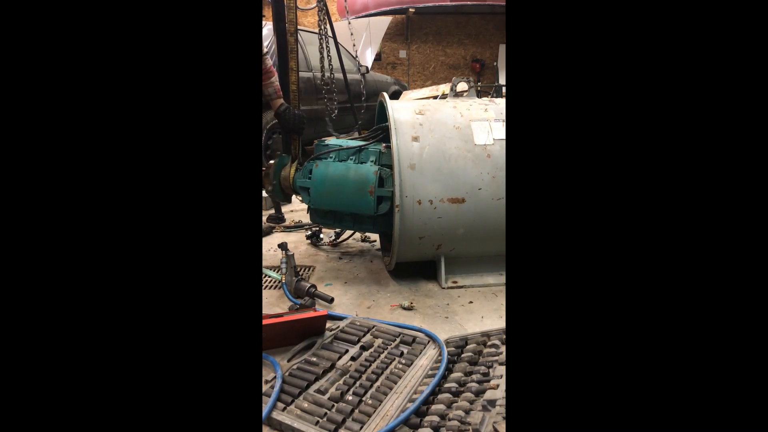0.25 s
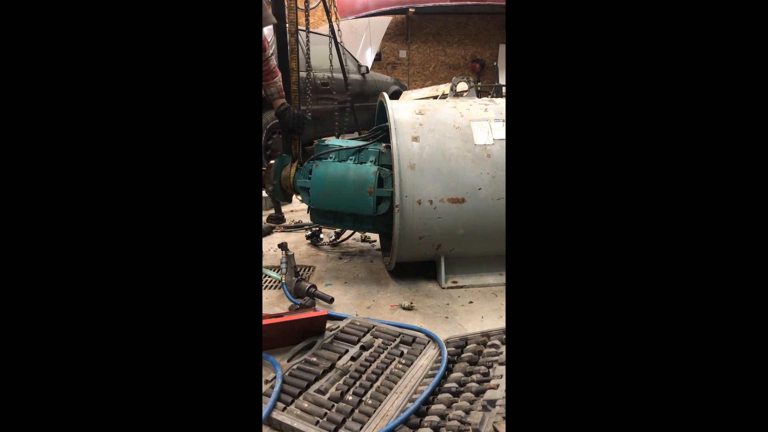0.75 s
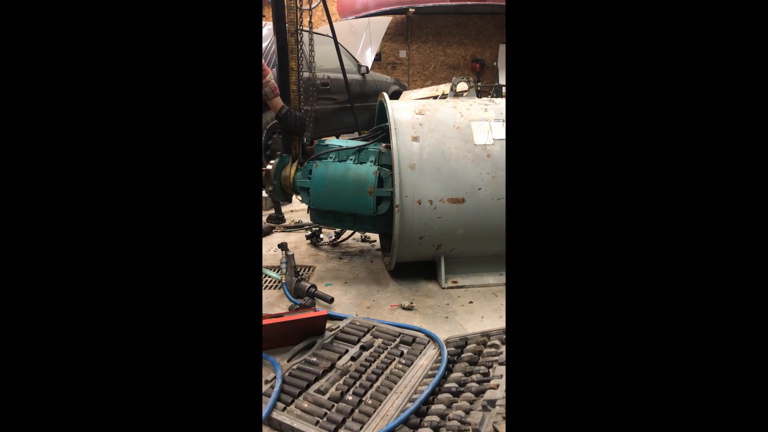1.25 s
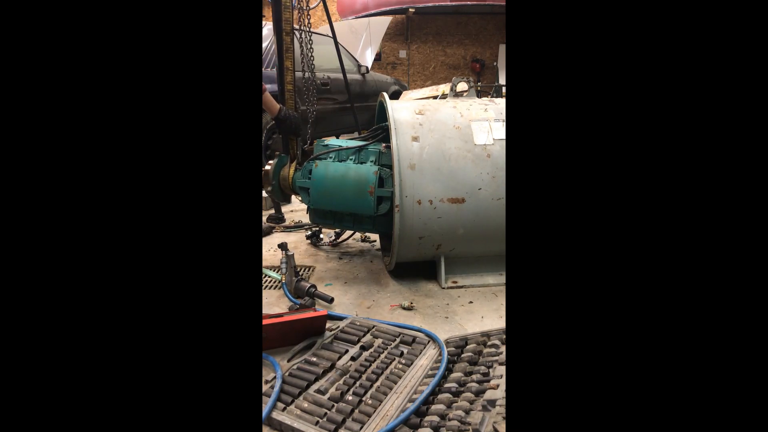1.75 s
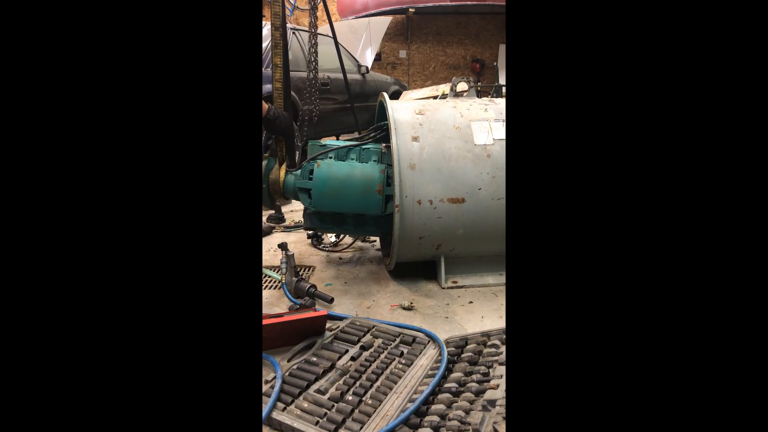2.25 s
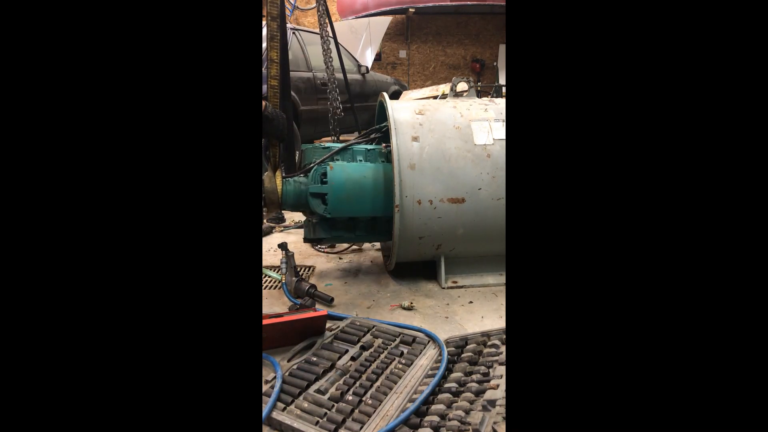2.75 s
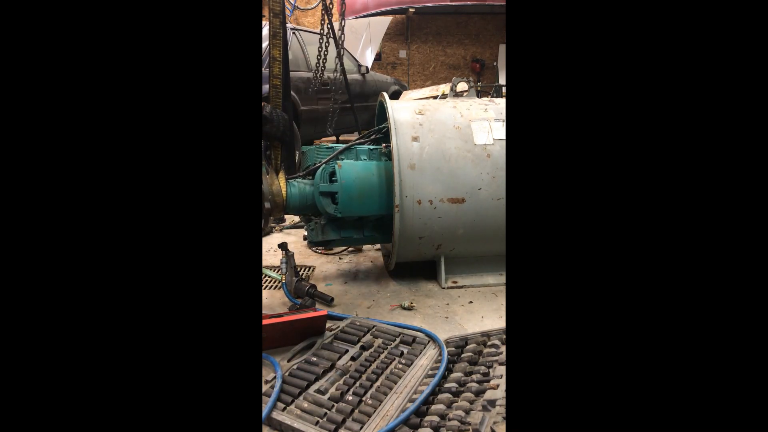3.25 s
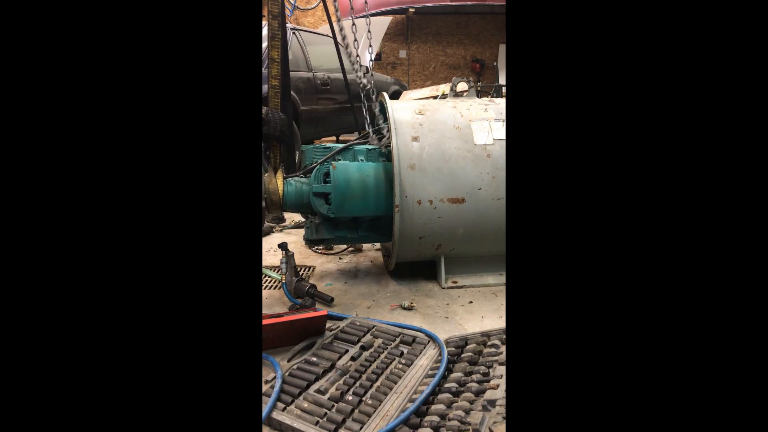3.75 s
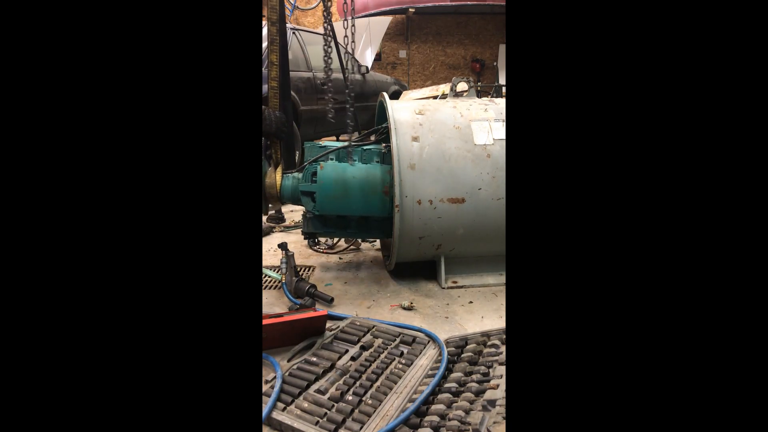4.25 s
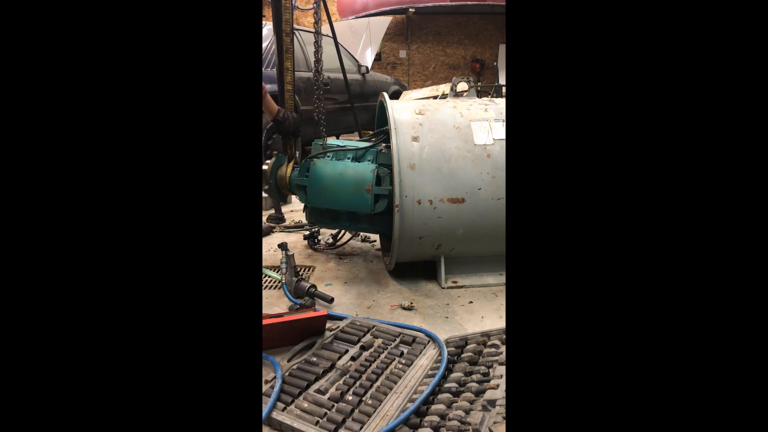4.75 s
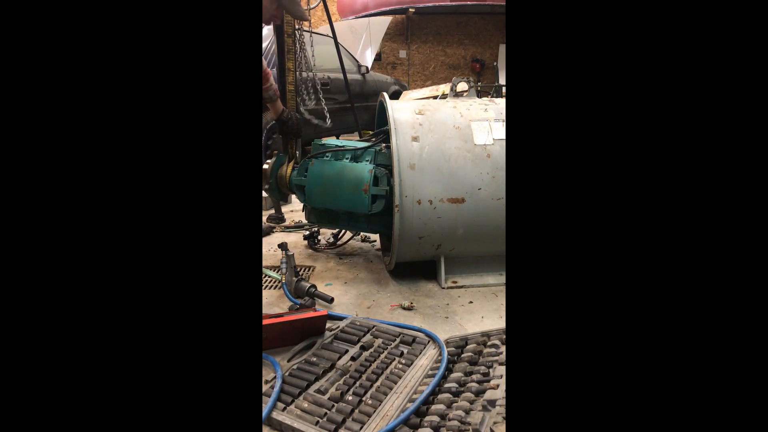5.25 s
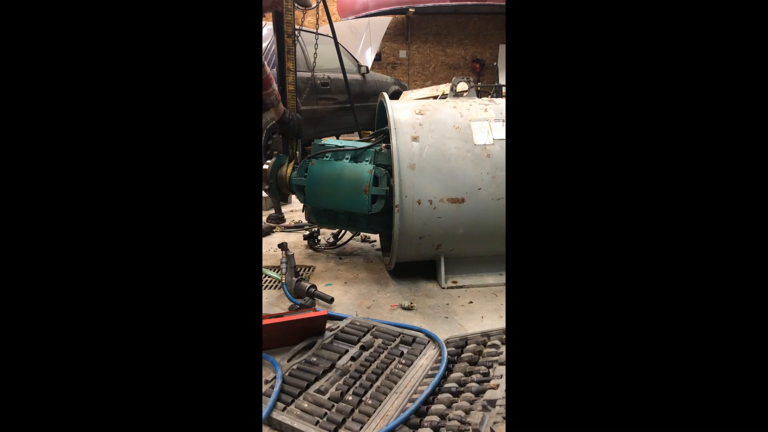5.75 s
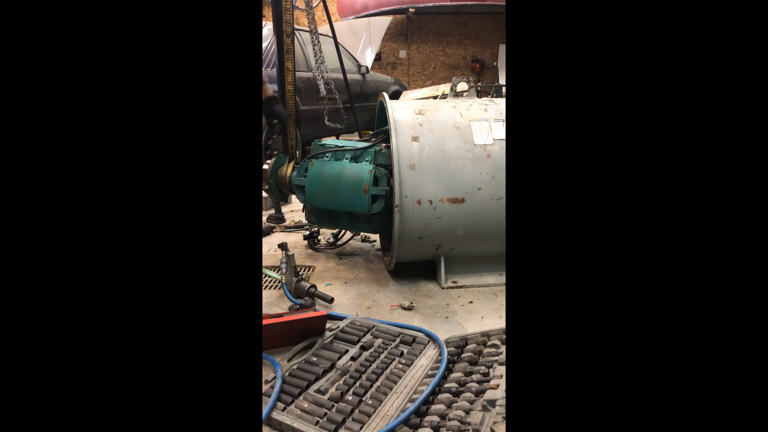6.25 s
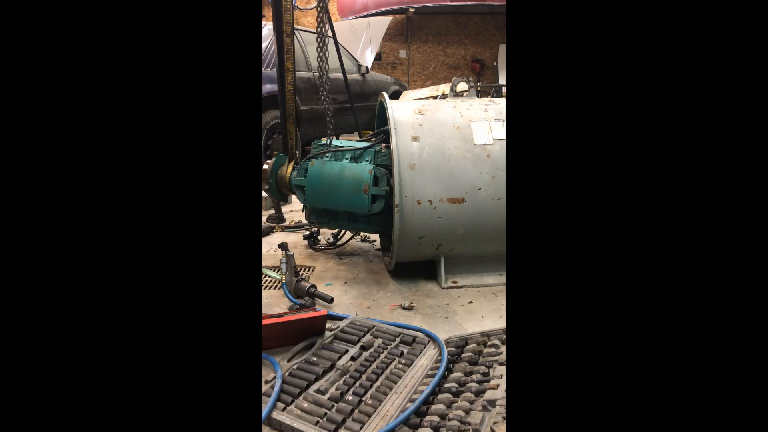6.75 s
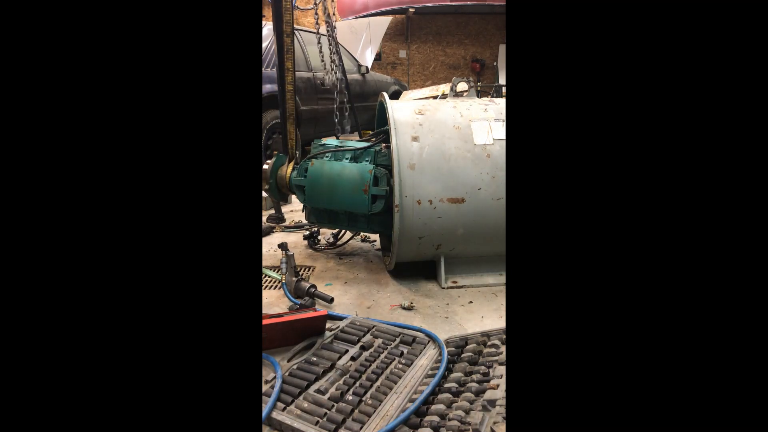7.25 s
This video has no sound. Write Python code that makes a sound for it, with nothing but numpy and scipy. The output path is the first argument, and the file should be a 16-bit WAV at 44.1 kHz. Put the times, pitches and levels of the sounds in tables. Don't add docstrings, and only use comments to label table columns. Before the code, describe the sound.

Chain links clink and snap as a heavy metal rotor rumbles and scrapes in its steel casing, then one loud ringing clang in a workshop.

```python
import sys
import numpy as np
from scipy import signal
from scipy.fft import rfft, irfft, dct
from scipy.io import wavfile

SR = 44100
rng = np.random.default_rng(int(sys.argv[2]) if len(sys.argv) > 2 else 0)


def natural_amplitude(level_db):
    exponent = np.asarray(level_db, float) / 20
    return 10 ** exponent


def inscribe(sig):
    pcm = np.round(np.clip(np.atleast_2d(sig).T, -1, 1) * 32767)
    wavfile.write(sys.argv[1], SR, pcm.astype(np.int16))


N = 330750

# (time [s], force [dB], rise [s per 20 dB], fall [s per 20 dB])
STROKES = [
    (5.55, -35, 0.0011, 0.2574),
    (5.62, -40, 0.043, 0.6155),
    (5.944, -34, 0.15, 0.0651),
    (5.957, -19.5, 0.014, 0.0154),
    (5.984, -12, 0.01, 0.0155),
    (6.0, -40, .011, 0.17),
]


def in_time(rows):
    s, *columns = np.transpose(rows)
    return [np.interp(np.arange(N) / SR, s, c) for c in columns]


def at_hz(points, hz):
    table_hz, values = np.transpose(points)
    return np.interp(np.log(hz + 1), np.log(table_hz), values)


def rms_one(x):
    return x / np.sqrt(np.mean(x ** 2) + 1e-20)


def band_pass(x, order, edges_hz):
    return signal.sosfilt(signal.butter(order, edges_hz, "band", fs=SR, output="sos"), x)


def band_noise(low_hz, high_hz):
    return rms_one(band_pass(rng.standard_normal(N), 2, [low_hz, high_hz]))


def colour(x, spectrum):
    hz = np.fft.rfftfreq(len(x), 1 / SR)
    low, high = spectrum[0][0], spectrum[-1][0]
    skirts = 1 / (1 + (low / (hz + 1)) ** 8 + (hz / high) ** 8)
    return rms_one(irfft(rfft(x) * natural_amplitude(at_hz(spectrum, hz)) * skirts, len(x)))


def grains(per_s, spread_db):
    sizes = natural_amplitude(spread_db * np.minimum(rng.exponential(1, N), 5)) * rng.choice([-1, 1], N)
    return rms_one(sizes * (rng.random(N) < per_s / SR))


def ring(drive, hz, t60):
    r, w = natural_amplitude(-60 / (max(t60, .003) * SR)), 2 * np.pi * hz / SR
    return signal.lfilter([0, np.sin(w)], [1, -2 * r * np.cos(w), r * r], drive + 1e-18)


def workshop_walls():
    # (frequency [Hz], t60 [s])
    walls_t60 = [(200, 0.61), (2000, 0.55), (6000, 0.55), (16000, 0.34)]
    t, out = np.arange(SR) / SR, 0
    for low in 125 * 2. ** np.arange(7):
        band = band_pass(rng.standard_normal(SR), 2, [low, 2 * low])
        out = out + band * natural_amplitude(-60 * t / at_hz(walls_t60, 1.2 * low))
    return out / np.sqrt(np.sum(out ** 2))


def chain_rustle():
    # (time [s], level [dB])
    haul = [(0.0, -47), (0.2, -62.5), (0.56, -59), (0.978, -74), (1.38, -56.5), (1.64, -68), (1.92, -74),
            (2.14, -59), (2.6, -55.5), (3.016, -40), (3.43, -68), (4.054, -59), (4.48, -62), (4.93, -46),
            (5.2, -68.5), (6.55, -60), (7.338, -71.5), (7.5, -48.5)]
    # (frequency [Hz], level [dB per Hz])
    chain_colour = [(1470, -40), (2500, -3.5), (4080, -1.5), (4970, -7), (6350, -4.5), (7670, -13),
                    (8570, -5.5), (10400, -15.5), (15100, -8.5), (16100, 7.5), (16500, -48)]
    chain_db, = in_time(haul)
    tick = np.exp(-np.arange(400) / 60.) * rng.standard_normal(400)
    rattle = signal.fftconvolve(grains(per_s=70, spread_db=2.0), tick)[:N + 2]
    fine_ticks = rms_one(np.diff(rattle, 2))
    return natural_amplitude(chain_db + 4.0) * colour(0.35 * fine_ticks + rng.standard_normal(N), chain_colour)


def bursts():
    # (time [s], length [s], level [dB], lower edge [Hz])
    jingle_runs = [(0.084, .04, -51, 6500), (0.558, 0.008, -49, 12000), (0.777, 0.018, -58, 10500),
                   (1.006, 0.06, -52, 5750), (1.07, 0.038, -49, 5100), (1.572, 0.011, -50, 9100),
                   (3.561, 0.043, -44, 5300), (4.5, .3, -53, 6500), (6.611, 0.15, -48.5, 6500),
                   (6.218, 0.036, -38.5, 7400), (6.322, 0.0096, -43, 8400)]
    # (time [s], level [dB])
    brush_runs = [(2.736, -54), (2.772, -50), (2.827, -45), (2.843, -46), (2.951, -47), (3.105, -44),
                  (3.126, -45), (3.218, -53), (4.078, -50), (4.586, -48), (4.628, -46), (4.663, -43),
                  (4.884, -42), (5.172, -55)]
    # (time [s], length [s], level [dB], centre [Hz])
    scuff_runs = [(0.71, 0.019, -55.5, 2000), (1.272, 0.058, -39, 2900), (1.75, 0.017, -55, 1300),
                  (2.332, 0.0093, -36.5, 300), (3.792, 0.072, -53.5, 3100), (4.36, .13, -54, 6000),
                  (4.833, 0.09, -33, 1210), (5.967, 0.055, -18, 11500), (6.493, 0.003, -31, 11300),
                  (6.605, 0.084, -40.5, 3900), (7.039, 0.031, -55, 1170)]
    # (time [s], length [s], level [dB], centre [Hz])
    squeal_runs = [(0.369, 0.25, -59, 5400), (.37, 0.32, -66, 4060), (1.925, 0.13, -56, 4340),
                   (2.109, 0.27, -52.5, 1080), (2.11, 0.26, -52, 4220), (2.72, 0.085, -46, 271),
                   (3.065, 0.055, -43, 1350), (3.201, 0.074, -47, 2800), (4.351, 0.3, -48, 1017),
                   (4.972, 0.13, -45, 1740), (0.0, 0.065, -52, 1085), (0.0, 0.14, -52, 1630),
                   (0.0, .08, -54, 3500), (0.022, 0.089, -58, 2920), (1.931, 0.091, -55.5, 1016),
                   (2.124, .2, -52, 3550), (2.55, 0.42, -50.5, 187), (2.6, 0.36, -52, 582),
                   (2.62, 0.4, -50.5, 980), (3.167, .04, -48, 6900), (4.419, 0.094, -46.5, 325),
                   (4.58, 0.049, -45, 165.5), (4.898, .07, -43, 270), (5.56, .2, -57, 720),
                   (6.606, .12, -49.5, 2600), (6.608, 0.087, -47, 3250), (6.601, 0.15, -53.5, 5400),
                   (6.85, 0.11, -59.5, 960), (7.033, 0.1, -61, 1017), (5.337, .2, -60, 4100),
                   (0.429, 0.094, -60, 1050), (0.472, 0.11, -61, 3100), (1.938, 0.13, -56.5, 4020),
                   (1.94, 0.13, -58, 4500), (2.109, 0.11, -52, 4520), (2.229, 0.096, -52.5, 1300),
                   (3.202, 0.13, -49.5, 329), (3.219, 0.092, -51, 3750), (3.655, .05, -63, 4600),
                   (4.51, 0.098, -51, 3750), (6.648, .2, -60, 300), (6.62, 0.17, -57.5, 803)]
    top_hz, brush_s, brush_above_hz = 15700, .009, 9500
    jingles_per_s, scuffs_per_s, squeals_per_s = 610, 3300, 1500
    scuff_width, squeal_width = 0.71, 0.055

    bright_runs = list(jingle_runs) + [(s, brush_s, db, brush_above_hz) for s, db in brush_runs]
    runs = [(s, length, db, (hz + top_hz) / 2, top_hz - hz, jingles_per_s)
            for s, length, db, hz in bright_runs]
    runs += [(*row, scuff_width * row[3], scuffs_per_s) for row in scuff_runs]
    runs += [(*row, squeal_width * row[3], squeals_per_s) for row in squeal_runs]

    out, size = np.zeros(N), SR // 2
    for s, length, level_db, hz, width_hz, per_s in runs:
        stroke = np.sin(np.pi * np.minimum(np.arange(size) / SR / length, 1) ** 0.6) ** .5
        hits = natural_amplitude(2.1 * rng.standard_normal(size)) * (rng.random(size) < per_s / SR)
        contacts = rng.standard_normal(size) * (0.27 + hits * np.sqrt(SR / per_s))
        edges = np.clip([hz - width_hz / 2, hz + width_hz / 2], 50, .45 * SR)
        heard = band_pass(contacts * stroke, 1, edges)
        i = round(s * SR)
        out[i:i + size] += (natural_amplitude(level_db) * np.sqrt(SR / 4 / width_hz) * heard)[:N - i]
    return out


def snaps():
    # (time [s], peak [dB], centre [Hz])
    snap_rows = [(0.091, -32, 10500), (0.1207, -27.5, 12400), (0.2318, -27, 9300), (0.278, -27.5, 9700),
                 (0.3688, -27, 6070), (0.631, -27.5, 10400), (0.722, -31, 8800), (0.9847, -45, 12100),
                 (1.0065, -41, 9900), (1.0188, -32, 11400), (1.024, -27, 12100), (1.03, -23.5, 11500),
                 (1.037, -25.5, 11800), (1.0888, -34, 10000), (1.407, -35, 7100), (1.8324, -43, 6100),
                 (1.925, -23, 10700), (1.9294, -25, 12300), (1.9666, -21, 10200), (2.1073, -26, 8300),
                 (2.1126, -17, 11700), (2.2235, -23, 7600), (2.2285, -26, 7500), (2.2697, -22, 11900),
                 (2.3432, -20, 7100), (2.469, -31, 9400), (2.5306, -29, 9900), (2.5449, -31, 11300),
                 (2.608, -26, 9800), (2.8713, -21, 8900), (2.876, -21, 7600), (2.9997, -18, 7860),
                 (3.0799, -20, 6800), (3.562, -20.5, 9800), (3.5703, -17, 10900), (3.5746, -25, 9600),
                 (3.597, -22, 13300), (3.5993, -29, 11800), (3.7267, -31.5, 8100), (3.929, -40, 11300),
                 (3.969, -31, 12700), (4.499, -17, 7200), (4.5027, -13.5, 9800), (4.722, -24, 9100),
                 (4.8168, -23, 10100), (5.5527, -26, 7400), (6.2267, -18, 7000), (6.245, -20, 7800),
                 (6.3247, -27, 6220), (6.4434, -36, 7800), (6.451, -31, 9300), (6.4964, -24, 11600),
                 (6.503, -29, 7900), (6.552, -33, 11500), (6.6044, -21, 5120), (7.302, -35, 11100),
                 (7.308, -28, 12300), (7.335, -27.5, 11600), (7.4214, -16, 5740), (7.433, -21, 9000)]
    echo_ms, echo_db, tail_db, tail_t60_s = .8, -8, -15, 0.0059
    out, size = np.zeros(N), 1024
    t = np.arange(size) / SR
    for s, peak_db, hz in snap_rows:
        click = natural_amplitude(tail_db - 60 * t / tail_t60_s) * rng.standard_normal(size)
        click[0] += 1
        click[round(echo_ms * SR / 1000)] -= natural_amplitude(echo_db)
        heard = band_pass(click, 2, [.58 * hz, min(1.7 * hz, .45 * SR)])
        i = round(s * SR) - 2
        out[i:i + size] += (natural_amplitude(peak_db + 1.0) * heard / np.abs(heard).max())[:N - i]
    return out


def knocks():
    # (time [s], peak [dB], frequency [Hz], t60 [s])
    knock_rows = [(0.373, -52, 6000, 0.1), (0.674, -43, 4310, 0.05), (1.32, -34.5, 300, 0.029),
                  (1.406, -44, 6280, 0.15), (1.831, -45, 6150, 0.087), (1.957, -29.5, 203, 0.049),
                  (2.344, -32, 6960, 0.066), (3.172, -30, 208, 0.098), (3.33, -39.5, 472, 0.24),
                  (4.027, -41, 300, 0.085), (4.049, -37, 3200, 0.076), (4.05, -37, 2860, 0.068),
                  (5.56, -47.5, 963, 2.3), (5.873, -31.5, 196, 0.038), (6.606, -51, 5254, 0.44),
                  (6.855, -41.5, 200, 0.051), (7.333, -42, 148.7, 0.053), (.466, -45, 3940, .1),
                  (1.215, -49, 5340, .1), (1.941, -34, 4220, 0.047), (2.008, -42, 7000, .03),
                  (2.248, -41, 6200, .04), (3.231, -34, 2740, .06), (4.05, -42, 2240, 0.1),
                  (4.052, -47, 1518, 0.21), (7.38, -38, 1860, 0.12)]
    out, size = np.zeros(N), SR // 2
    for s, peak_db, hz, t60 in knock_rows:
        contact = 0.044 * rng.standard_normal(size) * natural_amplitude(-60 * np.arange(size) / SR / t60)
        contact[0] += 1
        i = round(s * SR)
        out[i:i + size] += (natural_amplitude(peak_db) * ring(contact, hz, 0.48 * t60))[:N - i]
    return out


def clinks():
    # (time [s], peak [dB], ring [Hz], sparkle [dB re peak])
    slack_links = [(0.229, -40, 9200, -2), (0.2743, -47, 5600, -9), (0.3681, -33, 6120, -13),
                   (1.0244, -37.5, 9050, -4), (1.405, -37, 5930, -12), (1.9026, -42, 6300, -15),
                   (1.9251, -27, 8740, -8), (2.3155, -31.5, 8800, -8), (2.3426, -28, 6800, -9.5),
                   (2.9986, -23, 3590, -16), (3.562, -42, 7400, 3), (3.5952, -45, 9400, 1),
                   (3.7254, -48, 7100, -9), (3.7499, -47.5, 8700, 3), (3.9669, -48, 4260, 0),
                   (4.217, -37.5, 5500, -1), (4.241, -33.5, 6350, -6), (4.4997, -20, 6700, -15),
                   (4.563, -31, 8170, -2), (4.815, -38, 3240, 3), (6.497, -45, 3040, -6),
                   (7.151, -51, 5000, -12), (7.3018, -46.5, 9360, -0.5), (7.3363, -44.5, 9150, -8.5),
                   (7.4191, -25.5, 3910, -12)]
    taut_links = [(0.4212, -36.5, 6640, -10), (0.4648, -32, 6140, -27), (0.628, -44.5, 8870, -1),
                  (1.2684, -32.5, 3240, -25), (1.512, -38, 2900, -23), (1.83, -42, 6250, -26),
                  (1.964, -35.5, 8900, -4), (2.1075, -23.5, 4200, -5.5), (2.2205, -21, 5710, -8),
                  (2.265, -34, 9250, 3.5), (2.7876, -28, 3610, -2), (2.828, -31, 2560, -13),
                  (3.1926, -32, 2840, -11), (3.3787, -36.5, 3760, -7.5), (4.0292, -35, 4350, -13),
                  (4.05, -31, 3270, -17), (4.152, -27, 5480, -12), (6.441, -40, 3130, -18),
                  (6.6027, -23, 6060, -19)]
    loaded_links = [(0.0144, -27, 3500, -7.5), (0.12, -38, 3570, -19), (2.1395, -30, 4440, -34.5),
                    (2.292, -29.5, 4070, -18), (2.6064, -37, 9380, 2), (2.862, -25.5, 3310, -6),
                    (3.078, -22, 7070, -5.5), (3.229, -32.5, 2560, -17), (3.3003, -33.5, 3790, -28),
                    (4.7195, -29, 3510, -4), (4.8273, -30, 3530, -1.5), (5.3373, -41.5, 3830, -28),
                    (6.818, -40, 5230, -9.5), (7.3796, -32, 6660, -16)]
    # (frequency [Hz], level [dB per Hz])
    crack_colour = [(880, -6), (1500, -15), (2320, -5), (4280, 4.5), (4930, -0.5), (6460, 2.5), (10000, -5),
                    (13000, -81), (22000, -120)]
    kinds = [(slack_links, -25.5), (taut_links, -16.5), (loaded_links, -11.5)]
    contacts = [(*row, thud_db) for rows, thud_db in kinds for row in rows]

    out, size = np.zeros(N), SR // 4
    t = np.arange(size) / SR
    rise = np.minimum(t / 0.00263, 1)
    snap = rise * (natural_amplitude(-60 * t / 0.037) + 0.13 * natural_amplitude(-60 * t / 0.2))
    thud_fall = rise * natural_amplitude(-60 * t / 0.108)
    mode_fall = rise * natural_amplitude(-9.5 - 60 * t / 0.041)
    bright = colour(rng.standard_normal(N), crack_colour)
    sparkle, dull = band_noise(8300, 15700), band_noise(680, 3800)
    for s, peak_db, hz, sparkle_db, thud_db in contacts:
        i = round(s * SR)
        n = min(size, N - i)
        crack = (0.39 * bright[i:i + n] + natural_amplitude(sparkle_db - 1.0) * sparkle[i:i + n]) * snap[:n]
        thud = natural_amplitude(thud_db) * dull[i:i + n] * thud_fall[:n]
        modes = mode_fall * sum(np.sin(2 * np.pi * ratio * hz * t) for ratio in (.97, 1, 1.035))
        out[i:i + n] += natural_amplitude(peak_db + 1.5) * (crack + thud + modes[:n])
    return out


def shell(drive):
    # (frequency [Hz], level [dB per Hz])
    shell_colour = [(180, -50), (300, -38.5), (978, -12.5), (1390, -10), (1460, -2), (2100, -8),
                    (3190, 0.5), (4370, -6), (8220, -10), (13800, -26.5), (16000, -25.5)]
    # (frequency [Hz], t60 [s])
    shell_decay = [(300, 0.39), (1500, 0.72), (4000, 0.66), (9000, 0.4), (16000, 0.3)]
    spacing_hz, blur = 45.4, 1.0
    out, start = np.zeros(N), round((STROKES[0][0] - .1) * SR)
    size = N - start
    lines = rng.standard_normal(size) * (rng.random(size) < 1 / (spacing_hz * size / SR * 2))
    steady = rms_one(dct(lines)) + blur * rng.standard_normal(size)
    modes = colour(steady, shell_colour)
    edges = 250 * 2 ** np.arange(0, 6.2, .5)
    for k, (low, high) in enumerate(zip(edges, edges[1:])):
        r = natural_amplitude(-120 / (at_hz(shell_decay, np.sqrt(low * high)) * SR))
        put_in = band_pass(drive[start:] + 1e-18, 2, [low, high]) ** 2 * SR / 2 / (high - low)
        height = np.sqrt(signal.lfilter([1 - r], [1, -r], put_in))
        out[start:] += (-1) ** k * height * band_pass(modes, 2, [low, high])
    return out


def casing():
    # (time [s], force [dB])
    link_taps = [
        (5.6157, -32.5),
        (5.6611, -31),
        (5.7394, -33.5),
        (5.8771, -34.5),
        (5.916, -30.5),
    ]
    rim_hz = [963, 1497, 1836, 3133, 3230, 5443, 7973, 11280, 13370]
    # (level [dB], t60 [s])
    rim_modes = [(-17.5, .45), (-20, .7), (-23.5, 0.41), (-2, 0.66), (-10, 0.33), (-26, .3), (-19, 0.3),
                 (-17, 0.25), (-22, .25)]
    clear_hz = [963, 1497, 1630, 2212, 2612, 2981, 3116, 3244, 4047, 4607, 6155, 6445, 6568, 7966, 8150,
                13374, 13416, 2721, 7424, 9200, 11250]
    # (level [dB], t60 [s])
    clear_modes = [(-24, 2), (-10.5, 0.99), (-28.5, 1.1), (-24, 0.6), (-7.5, 0.21), (-27, 0.51),
                   (-6.5, 0.78), (-4.5, 0.23), (-15, 0.29), (-23.5, 0.11), (-22.5, 0.67), (-11.5, 0.27),
                   (-17, 0.27), (-13, 0.45), (-17, 0.3), (-18.5, 0.4), (-18.5, 0.4), (-17.5, .5),
                   (-15.5, .2), (-18.5, .25), (-23, .3)]
    blow_s, blow_db, contact_s, low_bloom_s = 5.98, -7, .007, .08
    gripped_s, grip_db, grip_above_hz = 6.37, -4, 2500
    damped_s, damped_t60_s = 6.55, 1.6
    tap_fall_s, tap_bright_db = .015, 4.0

    t = np.arange(N) / SR
    force_db = np.max([top_db - 20 * np.maximum((s - t) / rise, (t - s) / fall)
                       for s, top_db, rise, fall in STROKES], axis=0)
    drive = natural_amplitude(force_db) * (force_db > -85) * grains(per_s=2000, spread_db=3.5)
    edge = signal.sosfilt(signal.butter(1, 5000, "high", fs=SR, output="sos"), drive)
    drive = drive + natural_amplitude(1.3 * (force_db + 9.0)) * edge
    tap = sum(natural_amplitude(level_db - 20 * np.maximum(t - s, 0) / tap_fall_s) * (t >= s)
              for s, level_db in link_taps)
    drive = drive + natural_amplitude(tap_bright_db) * tap * band_noise(6500, 16000)

    before_blow = drive * (t < blow_s - .03)
    rim = sum(natural_amplitude(level_db - 25.5) * ring(before_blow, hz, t60)
              for hz, (level_db, t60) in zip(rim_hz, rim_modes))

    since = np.maximum(t - blow_s, 0)
    quick, slow = 1 - np.exp(-since / contact_s), 1 - np.exp(-since / low_bloom_s)
    gripped_db = grip_db * np.clip((t - gripped_s) / 0.018, 0, 1)
    resting = np.maximum(t - damped_s, 0)
    clear = np.zeros(N)
    for k, (hz, (level_db, t60)) in enumerate(zip(clear_hz, clear_modes)):
        onset = slow if k == 0 else quick
        mode_db = blow_db + level_db - 60 * since / t60 + gripped_db * (hz > grip_above_hz)
        mode_db = mode_db - 60 * resting * (hz / 1000) ** 2 / damped_t60_s
        clear += onset * natural_amplitude(mode_db) * np.sin(2 * np.pi * (hz * since + rng.random()))
    return rim + clear + natural_amplitude(5.5) * shell(drive)


def grit(low_hz, high_hz, per_s, cycles):
    slips, dealt = grains(per_s, spread_db=4.0), rng.integers(0, 24, N)
    pitches = np.geomspace(low_hz, high_hz, 24)
    return rms_one(sum(ring(slips * (dealt == k), hz, cycles / hz) for k, hz in enumerate(pitches)))


def rotor():
    # (time [s], drag [dB], grit [dB re drag])
    slide = [(0.0, -57, 14.5), (0.2, -63.5, 6), (0.6, -61.5, 3), (0.98, -63, -3.5), (1.38, -61.5, 4),
             (1.9, -64.5, -3), (2.2, -52, 1), (2.46, -64, 3.5), (2.55, -46.5, -3.5), (3.02, -47.5, 4.5),
             (3.55, -60.5, -2), (4.0, -64.5, 4.5), (4.3, -51.5, -3), (4.6, -41.5, -3), (5.02, -48.5, 9),
             (5.3, -62.5, 3), (6.5, -64, 9), (7.25, -68, 3)]
    # (time [s], rumble [dB], t60 [s])
    jolt_rows = [(0.0, -37, 0.49), (0.14, -37.5, 0.44), (.3, -56, 5), (1.27, -62, 0.49), (1.95, -52, .7),
                 (2.2, -46, 0.57), (2.52, -54, 2.3), (3.0, -46.5, 1.4), (4.08, -44.5, 0.31),
                 (4.3, -48, 1.5), (4.85, -37, 0.74), (5.25, -57, 1.1), (5.9, -52.5, 0.19),
                 (6.65, -61.5, 2.2), (7.32, -52.5, 0.59)]
    # (frequency [Hz], level [dB per Hz])
    rumble_colour = [(15, -14.5), (27, -15.5), (47, 3), (59, 7.5), (75, 6.5), (124, -7), (160, -21.5),
                     (210, -41.5), (350, -120)]
    grind_colour = [(71, -18.5), (120, 0.5), (161, 7), (226, 4), (270, 6), (421, -0.5), (561, -1),
                    (900, -5.5), (1170, -14.5), (1980, -120)]
    scrape_colour = [(350, -12), (600, -1.5), (704, -0.5), (804, -3.5), (995, 4.5), (1590, 1), (3380, -8),
                     (5000, -17), (6500, -31.5), (11000, -120)]
    jolt_rise_s, rumble_re_drag_db = 0.024, -6.5

    drag_db, grit_db = in_time(slide)
    t = np.arange(N) / SR
    jolts = sum(natural_amplitude(level_db - 60 * np.maximum(t - s, 0) / t60) * np.clip(1 + (t - s) / jolt_rise_s, 0, 1)
                for s, level_db, t60 in jolt_rows)
    rumble = (jolts + natural_amplitude(drag_db + rumble_re_drag_db)) * colour(rng.standard_normal(N), rumble_colour)
    rubbing = grains(per_s=490, spread_db=3.0) + 1.1 * rng.standard_normal(N)
    grind = natural_amplitude(drag_db - 2.0) * colour(rubbing, grind_colour)
    friction = colour(rng.standard_normal(N), scrape_colour)
    scrape = 0.81 * friction + 0.51 * grit(300, 4185, per_s=600, cycles=100.0)
    return rumble + grind + natural_amplitude(drag_db + grit_db) * scrape


def scene():
    steady = chain_rustle() + casing() + rotor()
    sharp = bursts() + snaps() + knocks() + clinks()
    echoes = signal.fftconvolve(sharp, workshop_walls())[:N]
    return (steady + sharp + natural_amplitude(-6.0) * echoes)[None]


def thin_out(x, count=24):
    # (time [s], depth [dB])
    thinned = [(.355, -17), (.76, -14), (2.38, -14), (2.488, -16), (2.892, -12), (2.978, -28), (3.043, -16),
               (3.188, -12), (3.535, -28), (3.617, -12), (4.343, -18), (4.866, -60), (5.07, -12),
               (6.114, -16), (6.288, -12), (6.413, -14), (6.479, -14), (6.798, -10), (7.225, -12),
               (7.394, -16)]
    # (time [s], [(frequency [Hz], level [dB])])
    survivors = [(.355, [(1373, -66)]), (2.488, [(716, -60), (1039, -58), (3246, -64), (7321, -67)]),
                 (2.978, [(668, -55), (1147, -55), (2589, -55), (3714, -64), (11120, -63)]),
                 (4.343, [(291, -60), (1034, -58), (3321, -61)]), (6.113, [(4420, -38), (6164, -38),
                 (8516, -40.5)]), (2.892, [(554.5, -43), (1028, -45), (2471, -52), (2993, -47), (6400, -55),
                 (12600, -55)]), (3.043, [(1254, -44), (1507, -45.5), (2288, -47), (2869, -48), (5900, -50),
                 (7000, -50), (8350, -51)]), (3.191, [(947.5, -54), (1378, -51), (2772, -57)]),
                 (4.867, [(1244, -37.5), (1491, -57), (1771, -46), (2293, -38), (3526, -45), (3693, -45)]),
                 (7.395, [(1846, -53.5), (2875, -55), (3854, -56), (6697, -61)])]
    out, size = x.copy(), 2048
    k = np.arange(size // 2 + 1)
    for s, depth_db in thinned:
        half_ms = 2.0 - .3 * depth_db
        i = round(s * SR) - size // 2
        lines = rfft(x[i:i + size] * np.hanning(size))
        tilt = np.abs(lines) * (k + 20.) ** 0.25
        kept = (tilt > np.sort(tilt)[-count]) | (k < 8)
        tones = irfft(lines * kept, size) * 0.91
        fade = np.clip(2 - 2 * np.abs(np.arange(size) - size / 2) / (half_ms * SR / 1000), 0, 1)
        out[i:i + size] += np.sin(np.pi / 2 * fade) ** 2 * (1 - natural_amplitude(depth_db)) * (tones - x[i:i + size])
    for s, tones in survivors:
        i = round(s * SR) - size // 2
        for hz, level_db in tones:
            tone = np.sin(2 * np.pi * (hz * np.arange(size) / SR + rng.random()))
            out[i:i + size] += natural_amplitude(level_db + 7.0) * np.hanning(size) * tone
    return out


def roll_off(x):
    return signal.sosfilt(signal.butter(12, 16980, fs=SR, output="sos"), x)


def record(dry):
    cut = signal.sosfilt(signal.cheby2(10, 50, 16600, fs=SR, output="sos"), dry[0])
    rounded = np.tanh(cut / 1.3) * 1.3
    return roll_off(thin_out(rounded)[None])


dry = scene()
out = record(dry)
inscribe(out)
```